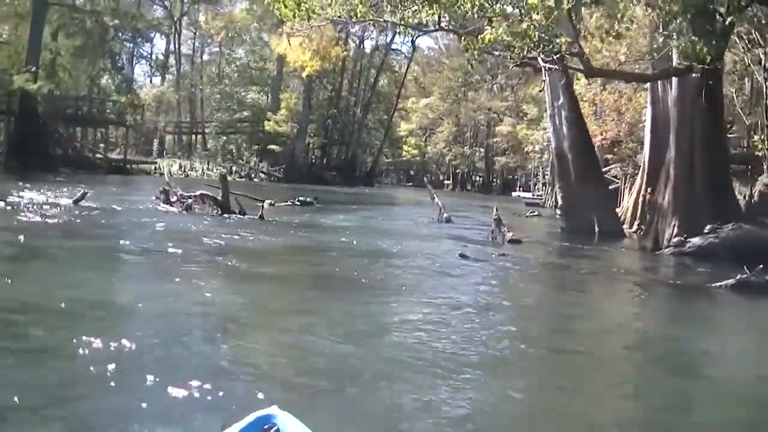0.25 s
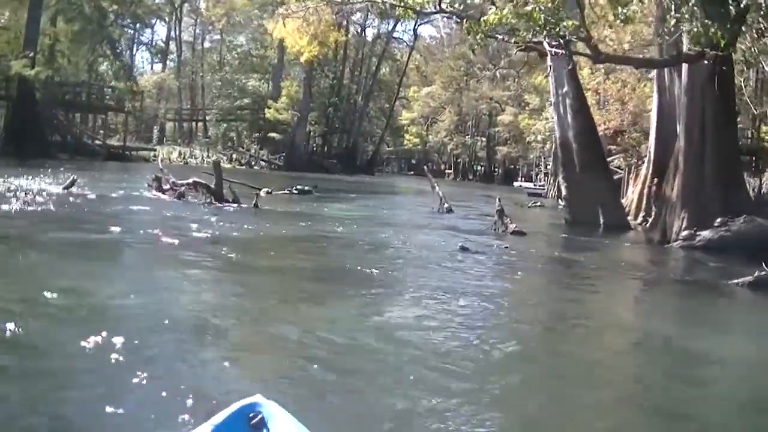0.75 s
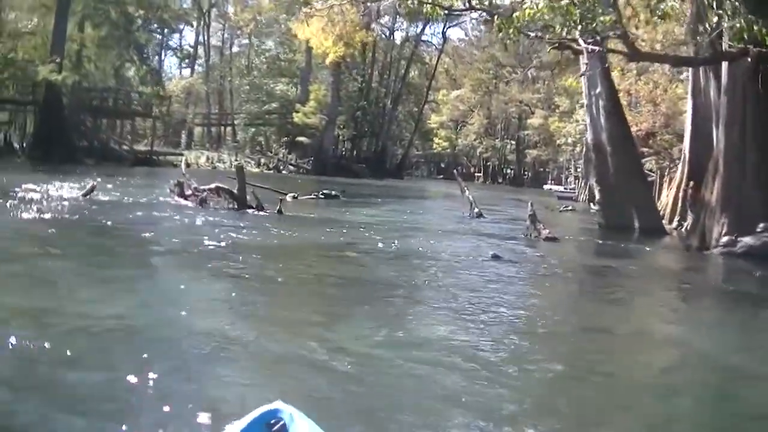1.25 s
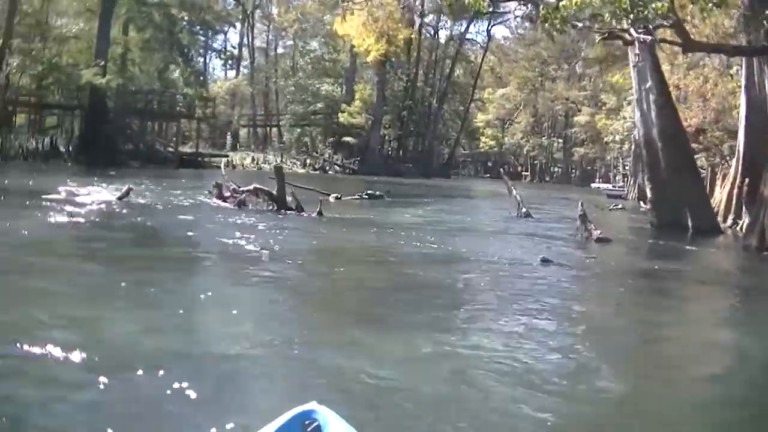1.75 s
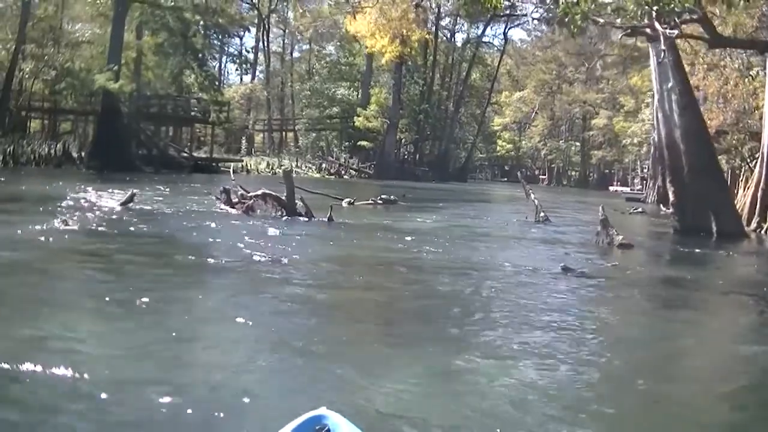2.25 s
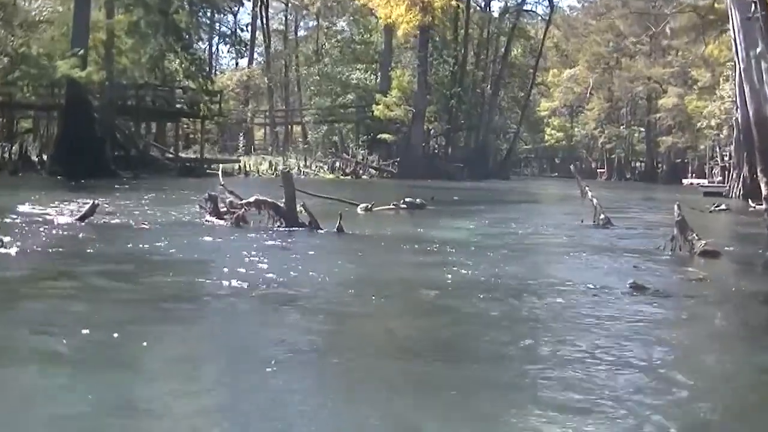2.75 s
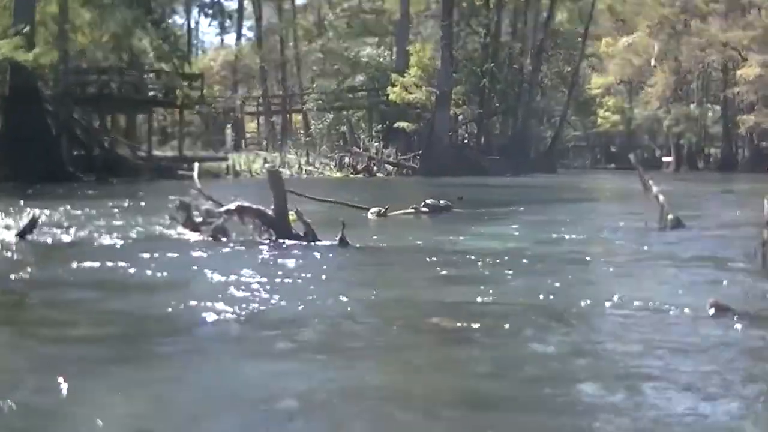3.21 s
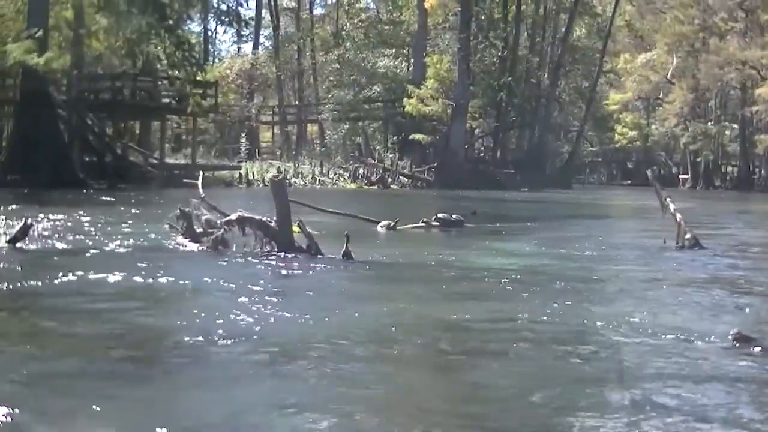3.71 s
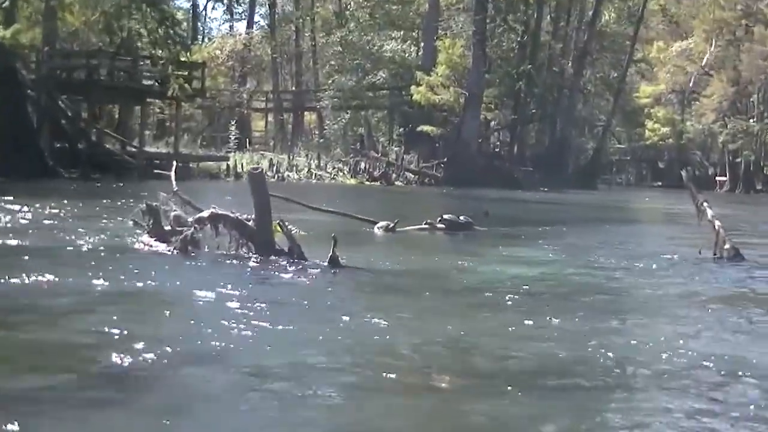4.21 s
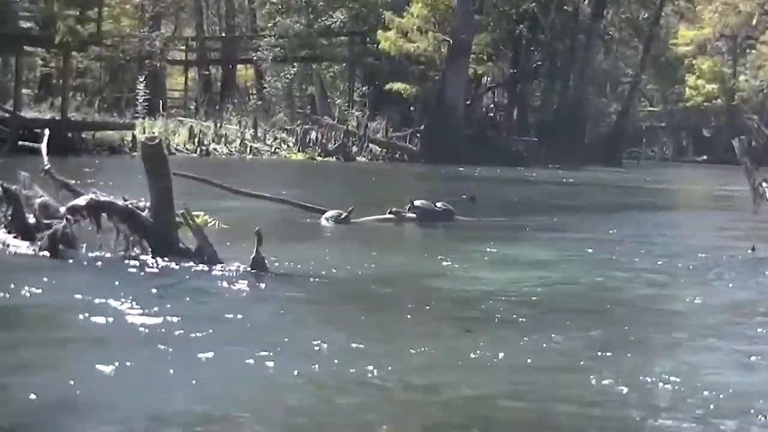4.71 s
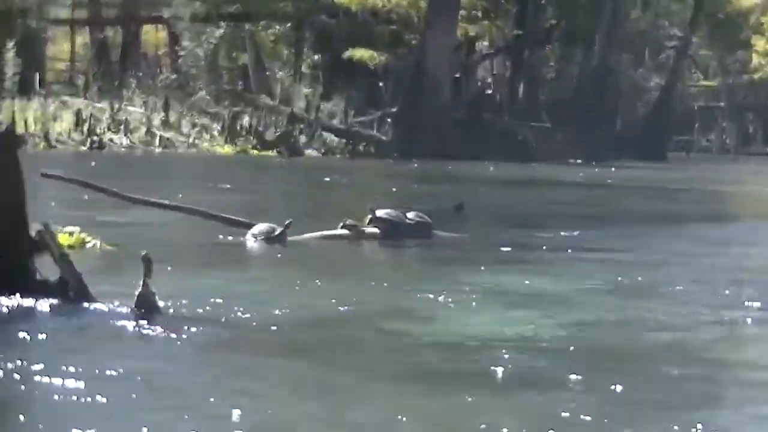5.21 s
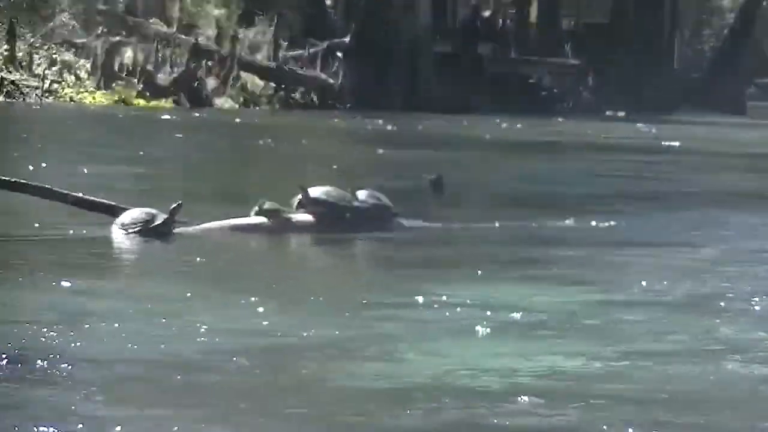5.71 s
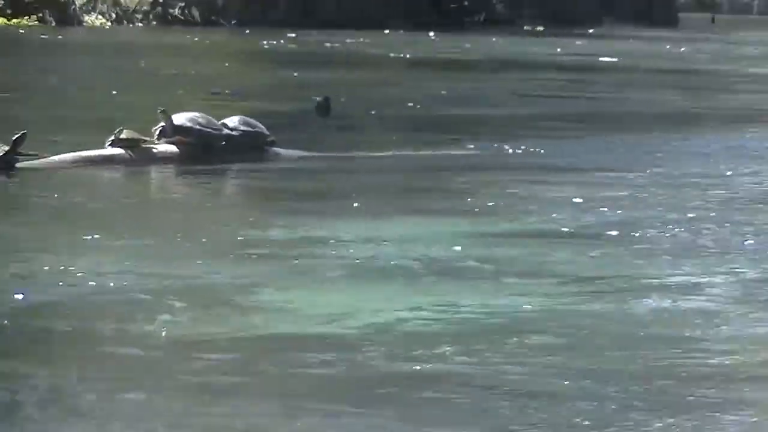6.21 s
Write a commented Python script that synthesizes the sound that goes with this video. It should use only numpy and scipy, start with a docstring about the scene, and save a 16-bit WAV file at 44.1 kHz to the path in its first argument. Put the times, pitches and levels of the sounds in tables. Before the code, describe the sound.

Sharp plastic clicks from handling a small camera, with faint focus ticking and two zoom motor hums over quiet outdoor hiss.

```python
"""Outdoors over calm water, a small hand-held camera hears itself through two microphones in its shell.
Fingers snap, thump and rub the plastic. The focus motor ticks about thirty times a second,
beside a thin, high pip. The camera zooms twice: its stepper motor speeds up in stages and hums
through the shell, while the moving lens squeaks in the first zoom and rustles in the second.
Faint air noise and amplifier hiss lie under it all."""
import sys
import numpy as np
from scipy import signal
from scipy.fft import rfft, irfft, next_fast_len
from scipy.io import wavfile
from scipy.ndimage import uniform_filter1d

SR = 44100
rng = np.random.default_rng(int(sys.argv[2]) if len(sys.argv) > 2 else 0)


def unload_audio(sound):
    """Save the sound as a 16-bit wav file, at the path given as the first command line argument."""
    columns = np.transpose(np.atleast_2d(sound))
    # keep every value between -1 and 1, then stretch to whole-number steps
    steps = np.round(np.clip(columns, -1, 1) * 32767)
    wavfile.write(sys.argv[1], SR, steps.astype(np.int16))


N = 284721


def amp(db):
    """Turns decibels into a multiplier."""
    return 10 ** (np.asarray(db) / 20)

def unit(x):
    """Scales a sound to an average (RMS) strength of 1."""
    return x / np.sqrt(np.mean(x ** 2) + 1e-20)

def along(points, hz):
    """Reads between (Hz, value) points, with octaves evenly spaced."""
    pitches, values = np.transpose(points)
    return np.interp(np.log(hz + 1), np.log(pitches + 1), values)

def curves(rows):
    """Joins rows of (seconds, values...) into one curve per value."""
    times, *columns = np.transpose(rows)
    return [np.interp(np.arange(N) / SR, times, column) for column in columns]

def filtered(x, response):
    """Multiplies each frequency in x by response(Hz)."""
    size = 2 * next_fast_len(x.shape[-1] // 2 + 4096)
    return irfft(rfft(x, size) * response(np.fft.rfftfreq(size, 1 / SR)), size)[..., :x.shape[-1]]

def causal(db):
    """A filter with these levels that rings only after a hit (minimum phase)."""
    cepstrum = irfft(np.log(amp(db)))
    cepstrum[1:len(cepstrum) // 2] *= 2
    cepstrum[len(cepstrum) // 2 + 1:] = 0
    return np.exp(rfft(cepstrum))

def bell(hz, centre_hz, octaves):
    """A smooth hump around one pitch."""
    return np.exp(-.5 * (np.log2((hz + 1) / centre_hz) / octaves) ** 2)

def add(out, start, sound):
    """Mixes in a stereo sound at a start time in seconds."""
    part = out[:, max(round(start * SR), 0):][:, :sound.shape[1]]
    part += sound[:, :part.shape[1]]

def stereo_noise(count, width):
    """Noise both sides share, plus some of their own."""
    return rng.standard_normal(count) + width * rng.standard_normal((2, count))

def ring(modes, gains, t, phase_spread):
    """Fading tones; each microphone hears them at its own strength and phase."""
    hz, db, fade_s = np.transpose(modes)[:, None, :, None]
    level, phase = rng.standard_normal((2, 2, len(modes), 1))
    fade = gains[:, None] * amp(db + 2 * level - 60 * t / fade_s)
    return (fade * np.sin(2 * np.pi * hz * t + phase_spread * phase)).sum(axis=1)


# The noise both sides share. Each row: frequency in Hz, relative level in dB.
AIR_MID = [(25, -27), (60, -26.5), (150, -9.5), (300, -6), (500, -8.5), (1000, -13), (2000, -9.5),
           (4000, -14), (8000, -18.5), (12000, -21.5), (16000, -26.5)]
# The noise that adds width. Each row: frequency in Hz, relative level in dB.
AIR_SIDE = [(25, -33), (60, -24), (150, -12), (300, -5.5), (500, -6.5), (1000, -12), (2800, -16.5),
            (5000, -27), (7000, -32), (9500, -53), (16000, -80)]
# How loud the two are. Each row: time in seconds, mid level in dB, side level in dB.
AIR_LEVELS = [(0.0, -61.5, -58.5), (6.46, -59.5, -58.5)]

def air():
    """Faint outdoor air and amplifier hiss, widest in the bass."""
    noise = rng.standard_normal((2, N))
    mid, side = filtered(noise, lambda f: amp([along(AIR_MID, f), along(AIR_SIDE, f)]))
    mid_db, side_db = curves(AIR_LEVELS)
    mid, side = unit(mid) * amp(mid_db), unit(side) * amp(side_db)
    return np.array([mid + side, mid - side])


# The tones of the plastic shell. Each row: pitch in Hz, level in dB, seconds to fade by 60 dB.
SHELL_TONES = [(783, -6.5, 0.029), (988, -1, 0.023), (1434, -5.5, 0.029), (1930, -4.5, 0.011),
               (2273, -2.5, 0.013), (2628, -3.5, 0.011), (2950, 2, 0.0086), (3318, 0.5, 0.0098),
               (3800, -2.5, 0.0032), (5030, -2, 0.013), (5335, 6, 0.0069), (5830, -1, 0.0068)]
# The tones of the air and battery space inside, with the same columns.
HOLLOW_TONES = [(152, -16.5, 0.038), (251, 0.5, 0.028), (354, 6, 0.014), (481, -9, 0.064)]
# Each row: start in seconds, level in dB, centre pitch in Hz, then dB adjustments for the knock,
# the low tones, the high tones and the crack, and last how many dB louder the left side is.
SNAPS = [(0.2455, -3.5, 2520, -28.5, -24, -11, -29, -2), (0.9048, -9.5, 2950, -26.5, -25, -17.5, -37, 0),
         (0.9387, -7, 2830, -27, -24.5, -20, -24.5, 1.5), (1.0134, -35, 3440, -9, -11, -22, -35, -7),
         (1.4285, -10.5, 2180, -18, -19, -14.5, -38, -5), (1.431, -7.5, 2640, -11, -26, -16.5, -50, 0),
         (1.6035, -11, 3480, -20, -44, -18, -31, -2), (1.7917, -10, 3560, -24.5, -30.5, -17, -36, 1),
         (1.807, -17, 2870, -20, -20.5, -17.5, -46, -0.5), (1.832, -40.5, 2550, -6, -22, -24, -30, 0),
         (2.1834, -47, 1760, -15, -18, -15, -7, 3), (2.2721, -31, 3100, -23, -22, -45, -36, 1),
         (2.2788, -30, 1870, -19, 8, -32, -37, 0), (2.618, -23.5, 2800, -44, -23, -14, -25, -4.5),
         (3.1331, -5.5, 3160, -44, -20, -17.5, -35, 0), (3.1594, -37, 2210, -3.5, -14, -33, -36, -1),
         (3.498, -28, 2680, -23, -13.5, -34, -40, 2.5), (4.9493, -32.5, 3230, -25, -17, -24, -29, 2),
         (5.3078, -38.5, 2200, -5, -15, -20, -16, 2), (5.7388, -6, 3120, -35, -22.5, -17, -33, -1.5),
         (5.8213, -22, 2810, -7, -10, -18, -37, -2.5), (5.8335, -1, 2350, -21, -21, -24.5, -30, -1.5),
         (6.1549, -30.5, 2160, -7, -22, -23.5, -36, 0), (6.2066, -29, 2380, -20, -34, -30, -36, 10),
         (6.2122, -28.5, 2600, -10.5, -8, -29, -36, -3)]

def snaps():
    """Plastic slips suddenly and rings the shell, with a hollow knock and a bright crack."""
    out, t = np.zeros((2, N)), np.arange(SR // 12) / SR
    hz = np.transpose(SHELL_TONES)[0]
    for start, db, centre_hz, knock_db, low_db, high_db, crack_db, left_db in SNAPS:
        middle = bell(hz, centre_hz, octaves=0.34)
        gains = np.select([hz < 1600, hz > 4300], [amp(low_db + 10), amp(high_db + 6)], middle)
        tones = ring(SHELL_TONES, gains, t, phase_spread=0.87)
        attack = 1 - np.exp(-(t / 0.00025) ** 2)
        damping = 1.05 + np.exp(-t / 0.0013)  # the finger quickly damps the ring
        body = filtered(tones * attack * damping, lambda f: (1j * f / (1j * f + 500)) ** 2)
        knock = ring(HOLLOW_TONES, np.ones(len(HOLLOW_TONES)), t, phase_spread=0.71) * amp([[3], [-3]])
        burst = stereo_noise(len(t), width=0.25) * amp(-60 * t / 0.0071)
        crack = filtered(burst, lambda f: bell(f, 7800, octaves=0.4))
        snap = 0.055 * unit(body) + amp(knock_db - 8.5) * knock + amp(crack_db - 29) * unit(crack)
        add(out, start, snap * amp(db + 3 + left_db * np.array([[.5], [-.5]])))
    return out


PICTURES_PER_S = 29.97
# Stretches of pipping. Each row: start in seconds, end in seconds, level in dB.
PIPS = [(0.278, .86, -69), (2.34, 3.217, -66.5), (3.25, 5.83, -74), (5.88, 6.5, -63.5)]

def pips():
    """A thin, high pip for every picture the camera takes, a little to the right."""
    t = np.arange(N) / SR
    whistle = filtered(rng.standard_normal(N), lambda f: bell(f, 3850, octaves=0.013))
    whine = np.sin(2 * np.pi * 3870 * t) + .5 * unit(whistle)
    pulse = (.5 + .5 * np.cos(2 * np.pi * PICTURES_PER_S * (t - .018))) ** 2
    level = sum(amp(db) * (t > start) * (t < end) for start, end, db in PIPS)
    return uniform_filter1d(level, size=1500) * pulse * whine * amp([[-1], [1]])


# The lens hunts for focus. Each row: start in seconds, end in seconds, level in dB,
# dB added to every second step, dB added to the low tones.
HUNTS = [(0.3117, 0.83, -38, -5, -9), (3.331, 3.62, -42, -3.5, -3.5), (3.63, 3.72, -39, 0.5, -9),
         (3.831, 3.95, -43.5, 2, -3.5), (6.014, 6.14, -42, 1.5, -5.5), (6.2187, 6.46, -40.5, -4, -0.5)]

def focus_steps():
    """The focus motor steps once a picture. Gives rows like those of LURCHES."""
    rows = []
    for first, end, db, offbeat_db, low_db in HUNTS:
        for k, start in enumerate(np.arange(first, end, 1 / PICTURES_PER_S)):
            late, size, low, ringing = rng.standard_normal(4)
            offbeat = k % 2  # every second step comes early and is duller
            rows.append((start - 0.00302 * offbeat + 0.001016 * late,
                         db + offbeat_db * offbeat + 1.8 * size,
                         low_db + 2 * offbeat + 3 * low,
                         3 * ringing))
    return rows


# The tones of the lens barrel. Each row: pitch in Hz, level in dB, seconds to fade by 60 dB.
BARREL_TONES = [(447, -3, 0.047), (667, -6.5, 0.084), (938, -10.5, 0.0095), (1415, -6, 0.02),
                (1900, -2.5, 0.053), (2400, -8, 0.017), (3380, -17, 0.017), (4005, -16.5, 0.029)]
# The lens lurches as a motor takes up or drops its load. Each row: start in seconds, level in dB,
# dB added to the low tones, dB of ringing over the dry shudder.
LURCHES = [(0.279, -42.5, -11, 3), (0.298, -42, -27, -14), (0.845, -46, -5, -4), (2.2768, -30, -19, 3),
           (2.4114, -46, -15, -5), (3.2257, -36.5, 3.5, -5), (3.2428, -42, 7, -4), (3.297, -44.5, 1, 6),
           (3.7495, -40.5, -2, 1), (3.9581, -34, -15, 3), (4.044, -44.5, -19, 3), (4.1181, -47, 5, -15),
           (5.879, -29.5, -7, 2), (6.1868, -38, 5, -15)]

def focus_ticks():
    """Each step or lurch is a short, dry shudder that also rings the lens barrel."""
    out, t = np.zeros((2, N)), np.arange(SR // 12) / SR
    hz = np.transpose(BARREL_TONES)[0]
    swell = t / .003 * np.exp(-t / 0.0027)
    for start, db, low_db, ring_db in LURCHES + focus_steps():
        tones = ring(BARREL_TONES, np.where(hz < 800, amp(low_db - 0.5), 1), t, phase_spread=0.52)
        shudder = stereo_noise(len(t), width=.5) * swell
        ringing = signal.fftconvolve(tones, shudder, axes=1)[:, :len(t)]
        click = filtered(shudder, lambda f: bell(f, 2470, 0.57) + amp(low_db + 7) * bell(f, 640, 0.88))
        tick = unit(amp(ring_db) * unit(ringing) + unit(click))
        tick_db = 4.27 * np.logaddexp(db / 4, (db + low_db) / 4) - 20  # strong lows make it louder
        add(out, start - .002, tick * amp(tick_db))
    return out


# Each row: start in seconds, level in dB, pitch in Hz.
THUMPS = [(0.48, -55, 143), (0.979, -47, 205), (1.746, -46.5, 185), (2.114, -47, 211), (3.497, -35.5, 254),
          (4.301, -33.5, 252), (4.314, -37.5, 242), (4.36, -32, 219), (5.813, -33, 244), (5.834, -30, 124),
          (5.856, -39, 233), (5.979, -36.5, 230), (6.16, -36, 445)]

def thumps():
    """The hand pushes softly on the shell: a couple of low waves, stronger on the left."""
    out, t = np.zeros((2, N)), np.arange(SR // 12) / SR
    for start, db, hz in THUMPS:
        cycles = hz * t
        push = np.sin(2 * np.pi * cycles) * amp(-60 * cycles / 2.72) * (1 - np.exp(-cycles / 0.22))
        add(out, start - .002, push * amp(db + 11 + np.array([[2.5], [-2.5]])))
    return out


# Each row: middle in seconds, length in seconds, scrape level in dB, drag level in dB.
SCRAPES = [(0.981, 0.15, -55, -63), (1.03, 0.094, -51.5, -60), (1.201, .064, -56.5, -66),
           (1.253, 0.075, -59.5, -66), (1.426, 0.058, -39.5, -41), (1.459, 0.14, -56.5, -61),
           (1.534, .06, -55.5, -59), (1.66, .15, -52, -57), (1.786, 0.075, -49, -59),
           (1.828, 0.085, -56, -58), (4.863, 0.067, -67, -45.5), (5.194, 0.064, -65, -44.5),
           (5.276, 0.023, -60, -43), (5.343, 0.03, -60, -49), (5.457, 0.11, -61, -48),
           (5.528, .076, -63, -46.5), (5.817, 0.054, -46, -56), (5.865, 0.052, -51, -46),
           (5.94, 0.18, -60, -56), (6.157, 0.036, -62, -48), (6.218, 0.077, -50, -55)]

def scrapes():
    """Grainy scrapes over a dull drag: fingers on the shell, and low rustles of the lens mid-zoom."""
    out, t = np.zeros((2, N)), np.arange(-SR // 6, SR // 6) / SR
    for middle, length, scrape_db, drag_db in SCRAPES:
        grain_db = 2.07 * rng.exponential(size=len(t) // 50 + 1)
        grains = amp(np.repeat(grain_db, 50)[:len(t)]) * stereo_noise(len(t), width=0.49)
        scrape = unit(filtered(grains, lambda f: bell(f, 2600, octaves=0.48)))
        drag = unit(filtered(grains, lambda f: bell(f, 480, octaves=1)))
        swell = np.exp(-8 * (t / length) ** 2)
        add(out, middle + t[0], (amp(scrape_db) * scrape + amp(drag_db) * drag) * swell)
    return out


CREEP_SPEED, SECOND_SPEED, FULL_SPEED = 45, 105, 119.9  # motor steps a second
# Each row: the times in seconds of start, second gear, full speed and stop, then level in dB,
# dB added while creeping, dB added to the upper tones, dB added to the buzz.
ZOOMS = [(2.333, 2.405, 2.478, 3.23, -48, -12, 0.64, -2.5), (4.029, 4.11, 4.168, 5.865, -47, -14, -1.5, -4)]

def zoom_gears(shift_s=0.012):
    """The motor speeds up in stages. Gives curves of speed, level, upper tones and buzz."""
    rows = []
    for *times, db, creep_db, upper_db, buzz_db in ZOOMS:
        stages = [(CREEP_SPEED, -100, upper_db, buzz_db),  # silent
                  (CREEP_SPEED, db + creep_db, upper_db - 2, buzz_db + 6),
                  (SECOND_SPEED, db - 3, upper_db, buzz_db),
                  (FULL_SPEED, db, upper_db, buzz_db),
                  (FULL_SPEED, -100, upper_db, buzz_db)]
        for k, time in enumerate(times):
            rows += [(time - shift_s / 2, *stages[k]), (time + shift_s / 2, *stages[k + 1])]
    return curves(rows)

def motor_jolts(steps_done):
    """Each step of the zoom motor gives one slightly uneven jolt."""
    count = int(steps_done[-1])
    at = np.interp(np.arange(count) + 1, steps_done, np.arange(N)) + rng.normal(0, 0.23, count)
    size = amp(rng.normal(0, 0.45, count) + 0.21 * (-1) ** np.arange(count))
    near = np.floor(at)[:, None] + np.arange(-7, 9)  # a jolt can fall between samples
    jolts = size[:, None] * np.sinc(near - at[:, None]) * np.hanning(near.shape[1])
    return np.bincount(np.clip(near, 0, N - 1).astype(int).ravel(), jolts.ravel(), N)


# How the shell colours the hum. Each row: multiple of the full step rate, level in dB.
HUM_TONES = [(1, -19.5), (2, 0.5), (3, -2.5), (4, -13.5), (5, -16), (6, -15.5), (7, -7), (8, -2),
             (9, -20.5), (10, -9.5), (11, -12.5), (12, -20), (13, -28), (14, -37), (15, -23), (16, -16.5)]
# Each row: frequency in Hz, how many dB louder the hum is on the left.
HUM_BALANCE = [(60, 8), (110, 4), (200, 6.5), (380, 4), (700, 2.5), (1290, 0), (2380, 5), (4400, 12.5),
               (8120, -20), (15000, 20)]
# Each row: frequency in Hz, how far the left side's wave is ahead in radians.
HUM_LEAD = [(100, 0.8), (260, -0.75), (600, 0.23), (1290, 0.78), (1980, 2.5), (2400, -5.5), (5000, 6)]

def shell_path(hz):
    """The shell carries the motor's shaking to each microphone differently."""
    tones = [(k * FULL_SPEED, db) for k, db in HUM_TONES]
    colour = causal(along([(33, -53.5), *tones, (2300, -37), (20000, -90)], hz))
    balance_db, lead = along(HUM_BALANCE, hz), along(HUM_LEAD, hz)
    sides = [amp(way * balance_db) * np.exp(1j * way * lead) for way in (.5, -.5)]
    delay = np.exp(-2j * np.pi * 0.00306 * np.clip(hz - 600, 0, 1500))  # 600-2100 Hz comes late
    return colour * sides * delay


# Where the lens carriage rings. Each row: pitch in Hz, width in Hz, level in dB.
CARRIAGE_TONES = [(1400, 400, -3), (1900, 150, -4), (2640, 70, 0), (3120, 150, -1), (3480, 300, -4),
                  (4400, 90, 0), (4750, 400, -11)]

def carriage(hz):
    """The carriage that holds the lens rings when shaken near its own pitches."""
    return sum((-1) ** k * amp(db) * 1j * hz * width / (pitch ** 2 - hz ** 2 + 1j * hz * width)
               for k, (pitch, width, db) in enumerate(CARRIAGE_TONES))

def zoom():
    """The motor's jolts hum through the shell, and the carriage rattles on every step."""
    speed, db, upper_db, buzz_db = zoom_gears()
    steps_done = np.cumsum(speed) / SR
    jolts = motor_jolts(steps_done) * np.sqrt(FULL_SPEED / speed)
    noise = stereo_noise(N, width=0.27)
    rattle = noise * (0.52 + np.exp(-3 * (steps_done % 1)))

    def upper_path(hz):
        return shell_path(hz) * (hz > 5.5 * FULL_SPEED)

    def through(path, shake, level_db):
        return filtered(shake * amp(level_db), path) / np.std(filtered(shake, path))

    hum = through(shell_path, jolts, db)
    upper_change = filtered(jolts * amp(db) * (amp(upper_db) - 1), upper_path)
    hum += upper_change / np.std(filtered(jolts, shell_path))
    roughness = through(upper_path, rattle, db + upper_db - 16.5) + through(shell_path, noise, db - 16)
    buzz = through(carriage, 0.88 * unit(jolts) + unit(rattle), db + buzz_db - 9)
    return hum + roughness + buzz

def squeak(start_s=2.535, rise_s=0.014, length_s=0.05, hz=3500, fall_hz_per_s=10000, db=-48):
    """The lens slips once on its rail with a short, falling squeak."""
    t = np.clip(np.arange(N) / SR - start_s, 0, length_s)
    swell = t / rise_s * np.exp(1 - t / rise_s) * (t < length_s)
    return amp(db) * swell * np.sin(2 * np.pi * (hz - fall_hz_per_s * t / 2) * t)

def scene():
    """Camera and finger sounds lose their deep bass in the small shell; the air is added on top."""
    shell = zoom() + squeak() + pips() + focus_ticks() + snaps() + thumps() + scrapes()
    return filtered(shell, lambda hz: (1j * hz / (1j * hz + 45)) ** 3) + air()

def record(dry):
    """The amplifier rounds off the loudest peaks, and nothing above 16000 Hz is kept."""
    rounded = dry / (1 + np.abs(dry / .97) ** 5) ** (1 / 5)
    return filtered(rounded, lambda hz: hz < 16000)


dry = scene()
out = record(dry)
unload_audio(out)
```